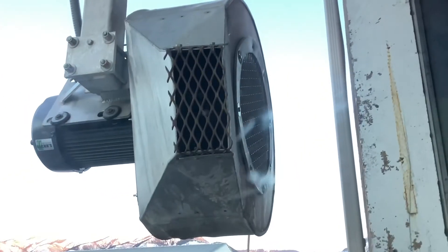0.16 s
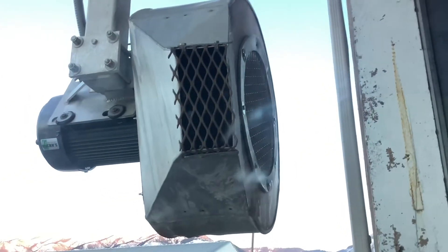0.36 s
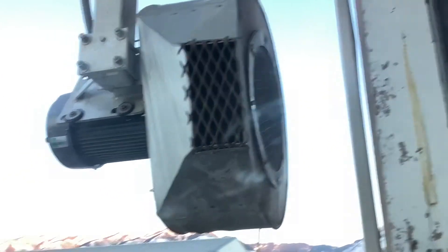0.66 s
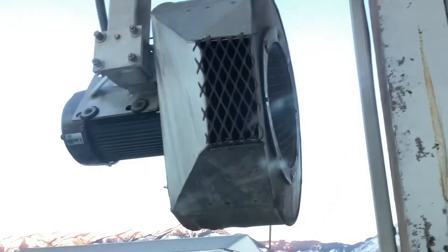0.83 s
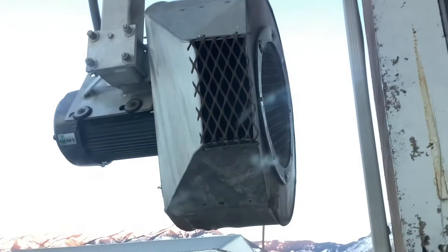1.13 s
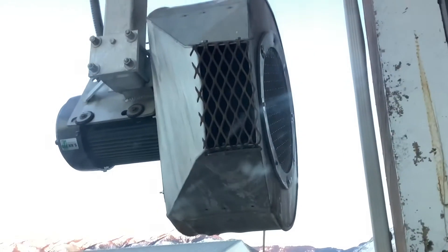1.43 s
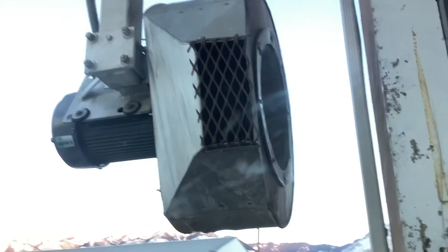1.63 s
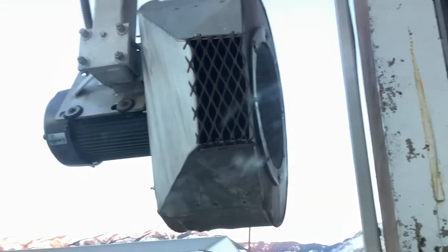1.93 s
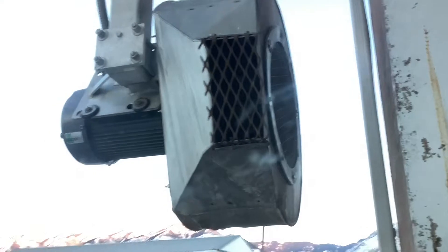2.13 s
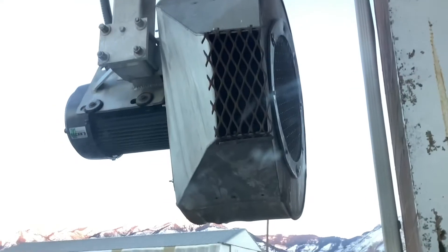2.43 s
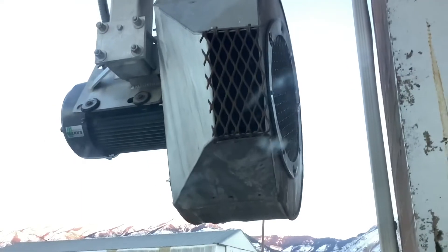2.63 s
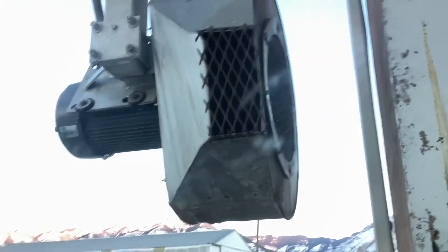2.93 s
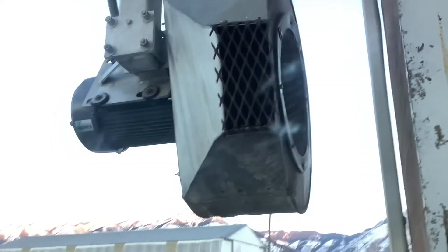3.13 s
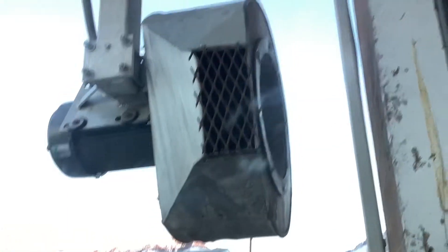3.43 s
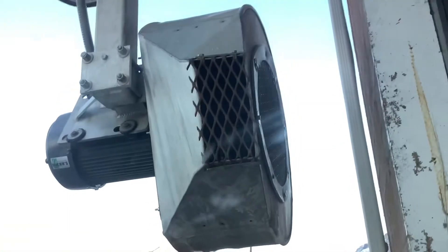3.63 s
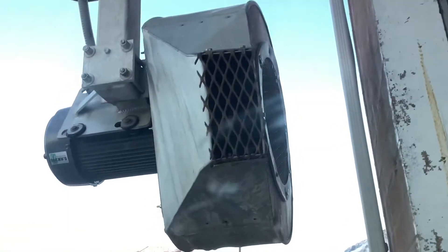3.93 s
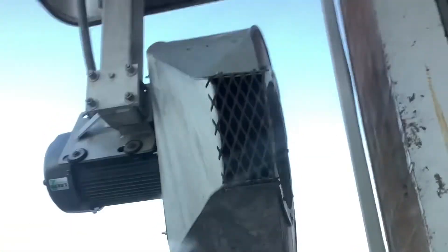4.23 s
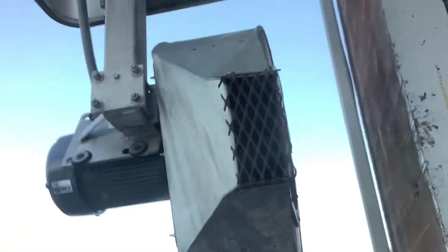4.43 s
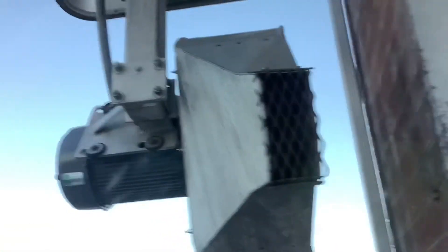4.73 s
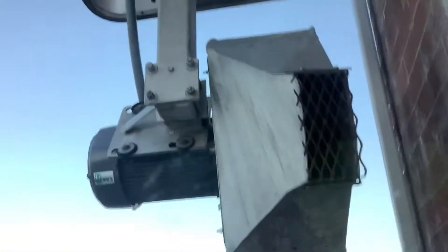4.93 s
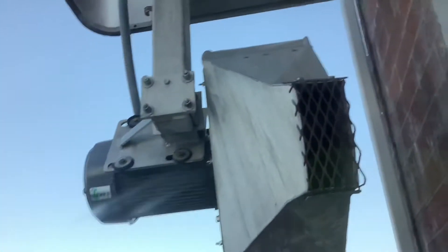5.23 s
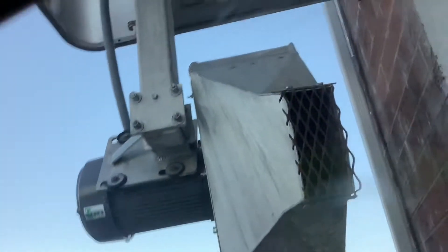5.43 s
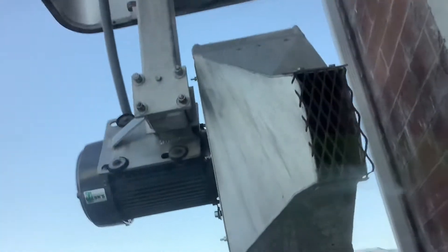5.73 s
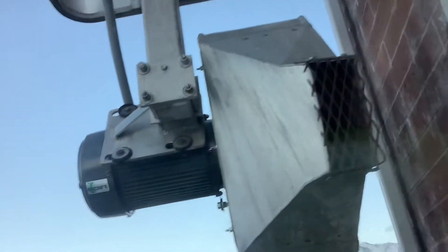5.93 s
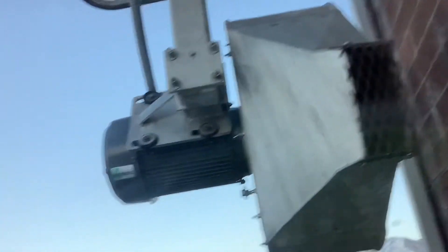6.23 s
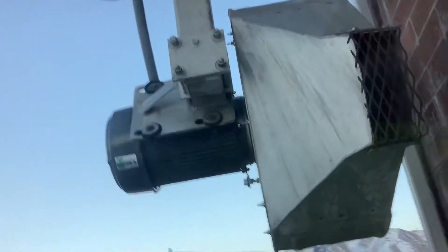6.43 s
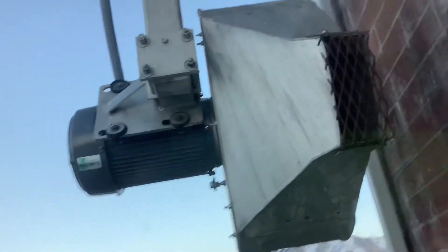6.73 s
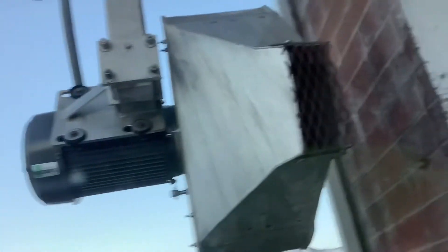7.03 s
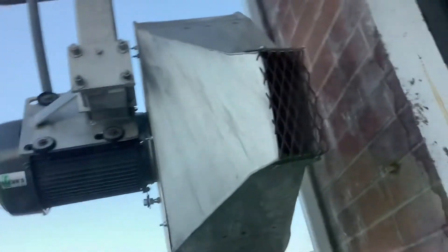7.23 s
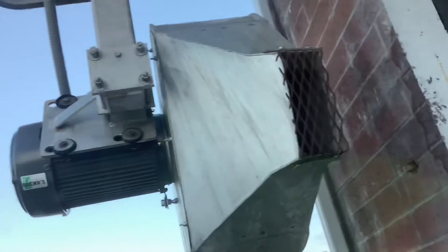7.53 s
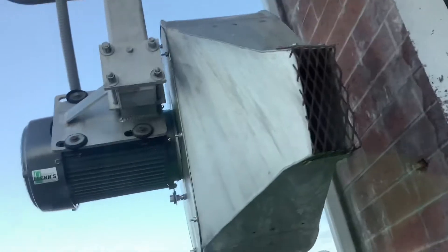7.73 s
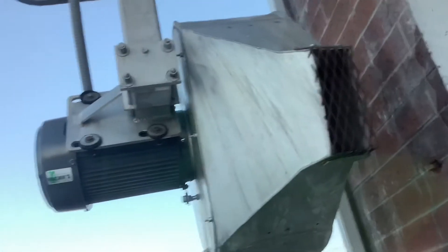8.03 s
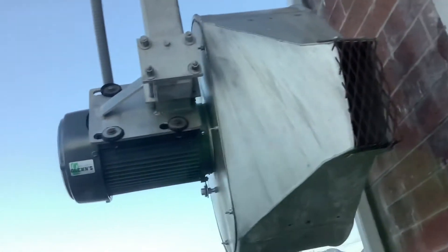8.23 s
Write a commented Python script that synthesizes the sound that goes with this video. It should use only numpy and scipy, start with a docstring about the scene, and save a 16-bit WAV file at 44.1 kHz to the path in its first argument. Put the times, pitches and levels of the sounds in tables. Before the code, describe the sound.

A continuous, loud blower roar fills a closed car cabin from 0 to about 8.4 s, already running at the start and with no silence. Most energy is low, a boomy drumming of air on roof and doors, with softer rush and hiss above. The sweeping jet swells near 0.7, 2.1, 3.6, 5.0, 6.4 and 7.9 s, sinking between; later swings are deeper and heavier. A wavering fan-blade hum, around 590 Hz with faint overtones, surfaces irregularly, clearest near 1.7, 3.1, 6.0 and 7.4 s. A fuzzy, fluttering whistle near 10 kHz flares briefly at 0.3, 0.6, 1.7, 2.7 and 3.9 s, frays after 4.3 s and vanishes around 5.4 s. A fainter, thinner whistle just below it fades around 4 s. As the car creeps past the nozzle, from about 5 s, the treble dulls slightly and the deep rumble strengthens, the roar continuing to the end.

```python
"""Car wash blowers from inside the car

A swinging nozzle sweeps its jet over the body about every 1.4 s and drums on roof, doors and glass:
noise shaped by a spectrum that moves with the jet and the car. The fans roar in the same noise, and their
ten-bladed wheels hum as wavering sines. Air whistles at a window seal, as narrow bands of noise,
until the car creeps on and the seal leaves the jet."""
import sys
import numpy as np
from scipy import signal
from scipy.io import wavfile
from scipy.ndimage import uniform_filter1d

SR = 44100
rng = np.random.default_rng(int(sys.argv[2]) if len(sys.argv) > 2 else 0)


def to_wav(s):
    """Save 16-bit WAV."""
    ch = np.atleast_2d(s).T  # columns
    pcm = np.round(np.clip(ch, -1, 1) * 32767)  # PCM
    wavfile.write(sys.argv[1], SR, pcm.astype(np.int16))


N = 369116  # length in samples


def gain_of(db):
    """dB to amplitude gain."""
    return 10 ** (np.asarray(db) / 20)


def evened(x):
    """Scales to rms 1."""
    return x / np.sqrt(np.mean(x ** 2) + 1e-20)


def bump(x, centre, width):
    """Bell curve of height 1; width is its standard deviation."""
    return np.exp(-0.5 * ((x - centre) / width) ** 2)


def columns(rows, t):
    """The columns of a curve table at times t, joined by straight lines."""
    times, *values = np.transpose(rows)
    return np.array([np.interp(t, times, v) for v in values])


def read(points, hz):
    """Reads a spectrum on a log-frequency axis, level beyond its ends."""
    f, value = np.transpose(points)
    return np.interp(np.log(hz + 1), np.log(f + 1), value)


def wander(hz, span=20):
    """Slow random curve of rms 1: 30 sines from hz / span to hz, the slower ones stronger."""
    t = np.arange(0, N + 64, 64) / SR
    rates = np.geomspace(hz / span, hz, num=30)
    slow = sum(np.sin(2 * np.pi * (f * t + rng.random())) / np.sqrt(f) for f in rates)
    return np.interp(np.arange(N) / SR, t, evened(slow))


def resonate(x, hz, width):
    """Narrow band around the curve hz: shifts it down to zero, smooths twice, shifts back."""
    turn = np.exp(2j * np.pi * np.cumsum(hz * np.ones(N)) / SR)
    r = np.exp(-np.pi * width / SR)
    smooth = x / turn
    for _ in range(2):
        smooth = signal.lfilter([1 - r], [1, -r], smooth)
    return (turn * smooth).real


# The jet's turning points, away from the car and on it by turns:
# [t/s, roof boom level/dB, door drumming level/dB, rush on the glass level/dB]
JET_SWING = [(0, -1, -1.5, -1.5), (.7, 1.3, 2.5, 2.5), (1.4, 0.5, -2.5, -1.5), (2.12, 1, 3, 2.5),
             (2.82, -1, -4.5, -1.5), (3.6, 2.5, 3, 4), (4.33, -2.5, -3.5, -1.5), (5.0, 2.5, 5.5, 0),
             (5.68, -2, -6, -3.5), (6.42, 4, 3.5, 2), (7.1, -2, -6, -2), (7.9, 5.5, 2.5, 1.5),
             (8.55, 1.5, -7.5, 3)]


def sweep(t):
    """Roof, doors and glass swell as the jet swings on and sink as it swings away, slowing at each turn."""
    ends = np.transpose(JET_SWING)[0]
    count = np.arange(len(ends))
    turn = np.interp(t, ends, count)
    eased = np.floor(turn) + 0.5 - 0.5 * np.cos(np.pi * (turn % 1))
    return columns(JET_SWING, np.interp(eased, count, ends))


# The car creeps on: [t/s, place (0 beside the nozzle, 1 under its edge, 2 past it)]
CAR_PLACE = [(0, 0.31), (4.0, 0.2), (5.2, 0.8), (5.8, 1.35), (7.0, 2), (8.37, 2.009)]
# Panels and cabin air shaken by the jet, before swells: [f/Hz, level/dB per Hz]
BODY_SPECTRUM = [(22, -61), (28, -58.5), (67, -39), (121, -36.5), (148, -35), (216, -41.5), (247, -40),
                 (283, -46.5), (303, -46), (331, -45.5), (453, -49.5), (542, -53), (580, -55.5), (620, -57)]
# Fan roar through the shut windows, one spectrum for each place: [f/Hz, level/dB per Hz]
ROAR_SPECTRA = [
    [(660, -60), (814, -64), (1040, -64), (1250, -73), (1390, -64.5), (1450, -66), (1550, -72), (1660, -74),
     (1900, -71.5), (2300, -76.5)],
    [(660, -64), (712, -57), (970, -73), (1230, -69), (1350, -72.5), (1510, -79.5), (1740, -76),
     (1910, -76.5), (2130, -78), (2300, -74.5)],
    [(660, -55), (706, -56.5), (962, -66), (1200, -67), (1350, -70), (1630, -74), (1760, -81),
     (1950, -79.5), (2080, -85), (2300, -83.5)],
]
# Jet hiss and fizz at the seals, one spectrum for each place: [f/Hz, level/dB per Hz]
HISS_SPECTRA = [
    [(2450, -76), (2810, -77.5), (3690, -78), (4080, -80.5), (6140, -88.5), (6380, -90.5), (7400, -85.5),
     (8590, -86), (9490, -78.5), (9850, -97), (10700, -81.5), (11400, -81), (11900, -84.5), (15600, -101.8)],
    [(2450, -83), (2640, -76.5), (2740, -83), (3030, -79.5), (3140, -79), (4500, -87), (5430, -89),
     (6140, -91.5), (8810, -85), (10100, -81.5), (10500, -83), (11300, -87), (13400, -98), (15600, -101.3)],
    [(2450, -80), (2610, -80.5), (2710, -84), (2840, -79), (3340, -86.5), (3510, -82.5), (3980, -85),
     (5560, -88.5), (6300, -91), (7040, -86.5), (9970, -83), (10600, -85), (11700, -90.7), (15600, -100.8)],
]
# Narrow cabin resonances: [f/Hz, width/Hz, lift/dB at each of the three places]
CABIN_RESONANCES = [(517, 21.5, 2, 3, 5), (840, 45, .5, 1.2, 3), (1010, 58, 1.1, 2.5, 1.7),
                    (4700, 92, .1, .1, 2.5), (5600, 150, .1, .1, 2.5)]
DEEP_LIFT_DB = (-5.5, 1.5, 2.5)  # the deepest rumble grows from place to place
DEEP_EDGE_HZ = (45, 70)  # the lift is full below the first, none above the second


def place_spectrum(hz, t):
    """Air noise coloured by panels, windows and cabin, blending from place to place as the car creeps on."""
    place = columns(CAR_PLACE, t)[0]
    near = [np.clip(1 - abs(place - k), 0, 1) for k in range(len(ROAR_SPECTRA))]  # weight of each place
    field_db = np.zeros((len(hz), len(t)))
    for roar, hiss, weight in zip(ROAR_SPECTRA, HISS_SPECTRA, near):
        # body, roar and hiss join end to end into one spectrum
        field_db += np.outer(read([*BODY_SPECTRUM, *roar, *hiss], hz), weight)
    for f, width, *lift_db in CABIN_RESONANCES:
        field_db += np.outer(bump(hz, f, width), np.dot(lift_db, near))
    deep = read(np.c_[DEEP_EDGE_HZ, (1, 0)], hz)
    return field_db + np.outer(deep, np.dot(DEEP_LIFT_DB, near))


# Slow swell of the fans: [t/s, roar level/dB, airy rush level/dB, hiss level/dB]
FAN_SWELL = [(0, 0, -2, -0.5), (1.3, -1, -1.5, -1), (2.9, 0, -1.7, -0.7), (3.7, -0.5, -1, -1.5),
             (4.5, 0, -1.3, 2), (5.2, 1.2, -2.3, 0.5), (5.7, -2, 0, 0.5), (6.3, 1, 0.5, -.8),
             (6.8, -1.5, 1, -0.5), (7.3, -0.7, -1.5, 1), (8.0, 3.5, -0.5, 1.5), (8.37, -1, 0.5, -2.5)]
# Where each swell acts in full, between two still ends: [f/Hz]; first roof, doors, glass
SWEEP_BANDS = (70, 135, 240, 430, 900)
# then roar, airy rush, hiss of the fans
FAN_BANDS = (600, 1000, 2700, 5100, 7500)
# The colour of the rush shifts for a while: [t/s, half length/s, f/Hz, width/Hz, lift/dB]
COLOUR_SHIFTS = [(4.5, 0.35, 2900, 90, 6.5), (5.0, 0.45, 2000, 70, 3.5), (5.2, 0.79, 1520, 120, -0.5),
                 (6.5, .3, 2120, 140, -5), (7.4, .35, 2220, 200, 5), (7.9, 0.46, 1340, 200, 1),
                 (7.4, .4, 2540, 80, 2), (7.5, .5, 5400, 200, 1.5), (6.65, .25, 5100, 540, -2.5),
                 (7.4, 0.37, 3000, 150, -1)]


def swell_spectrum(hz, t):
    """Level changes of jet swing, fans and passing colours, each in its own band."""
    swell_db = np.zeros((len(hz), len(t)))
    for curves, centres in ((sweep(t), SWEEP_BANDS), (columns(FAN_SWELL, t), FAN_BANDS)):
        for k, curve_db in enumerate(curves):
            band = np.arange(len(centres)) == k + 1
            swell_db += np.outer(read(np.c_[centres, band], hz), curve_db)
    for s, half, f, width, lift_db in COLOUR_SHIFTS:
        swell_db += lift_db * np.outer(bump(hz, f, width), bump(t, s, half))
    return swell_db


def grain(hz, t, eddies_db=0.7, drift_db=2.0):
    """Random eddies, and fine drifting ridges from the many small reflections of the cabin."""
    eddies, ridges = rng.standard_normal((len(t), len(hz), 2)).T
    eddies = uniform_filter1d(uniform_filter1d(eddies, size=40, axis=0), size=7, axis=1)
    # ridges: narrow in pitch, drifting within a second
    ridges = uniform_filter1d(uniform_filter1d(ridges, size=8, axis=0), size=35, axis=1)
    # the ridges are strongest in the low treble
    depth = read([(300, 0.093), (2000, 0.7), (6000, 1.0), (12000, 0.6)], hz)[:, None]
    return eddies_db * evened(eddies) + drift_db * evened(ridges) * depth


def rush(gusts, gusts_db=0.7, buffet_db=0.41, seal_hz=6000):
    """Turbulent air: white noise shaped frame by frame, buffeted at the panels and gusting at the seals."""
    frame, hop = 4096, 512  # samples
    noise = rng.standard_normal(N + frame)
    hz, t, air = signal.stft(noise, SR, nperseg=frame, noverlap=frame - hop)
    field_db = place_spectrum(hz, t) + swell_spectrum(hz, t) + grain(hz, t)
    shaped = air * gain_of(field_db) * np.sqrt(SR / 2)  # dB per Hz to noise level
    at_seals = read([(seal_hz / 2, 0), (seal_hz * 2, 1)], hz)[:, None]
    parts = shaped * np.array([1 - at_seals, at_seals])
    body, seals = signal.istft(parts, nperseg=frame, noverlap=frame - hop)[1][:, :N]
    # the jet buffets the panels unevenly; short gusts make the whole treble flicker together
    buffeted = body * gain_of(buffet_db * wander(25.0, span=12))
    return buffeted + seals * gain_of(gusts_db * gusts)


BLADE_HZ = 587.0  # centre pitch: ten blades on a shaft near 59 turns a second
# Tones of several fans add and cancel; rms level before wavering: [t/s, level/dB]
BLADE_LEVEL = [(0, -59), (.3, -41), (1.0, -37.5), (1.25, -41.5), (1.7, -31.5), (2.0, -43.5), (2.6, -39.5),
               (3.1, -35.5), (3.8, -38.5), (4.5, -51), (4.8, -37), (5.5, -51), (6.0, -35), (6.6, -40.5),
               (7.4, -31.5), (7.8, -42), (8.37, -38)]
# Overtones, rms level before wavering: [multiple of the blade tone, level/dB]
BLADE_OVERTONES = [(2, -53.5), (3, -62), (4, -72), (5, -69)]


def blades():
    """The blade tone and its multiples waver as the turbulent air between fan and car shifts."""
    turns = np.cumsum(BLADE_HZ + 2.2 * wander(9.0)) / SR  # cycles of the blade tone
    level_db = columns(BLADE_LEVEL, np.arange(N) / SR)[0] + 3.3 * wander(14.0)
    hum = gain_of(level_db) * np.sin(2 * np.pi * turns)
    for k, db in BLADE_OVERTONES:
        hum += gain_of(db + 2.0 * wander(3.9)) * np.sin(2 * np.pi * (k * turns + rng.random()))
    return np.sqrt(2) * hum  # sine peak from rms level


# Air through the main slit in the seal, before flares, flutter, drift and fade-out; the fray is
# relative to the core: [t/s, level/dB, nominal f/Hz, frayed upper edge level/dB]
SEAL_WHISTLE = [(0, -48, 10000, -5), (1.2, -47, 10060, -11), (2.2, -46.5, 10000, -7),
                (3.2, -45, 10040, -13), (4.1, -45.5, 10060, -5), (4.35, -48.5, 10000, -1),
                (4.6, -48.5, 10350, 1), (4.9, -53, 10000, 2), (5.4, -56, 10000, -3)]
# The whistle flares: [t/s, lift/dB]
WHISTLE_FLARES = [(.28, 2.5), (.62, 3.5), (1.36, 1), (1.71, 5), (2.7, 3.5), (3.87, 4), (4.32, 2.5)]
FLARE_S = 0.059  # half width of a flare
PUFFS_DB, QUAVER_HZ = 0.1, 30.0  # rms of the lesser puffs and of the random pitch drift
SLIT_HZ = 9720  # the main slit passes next to nothing lower


def high_whistle(gusts):
    """Main slit: fuzzy narrow noise with a sharp lower edge, fraying upward and fluttering in the gusts."""
    t = np.arange(N) / SR
    level_db, hz, fray_db = columns(SEAL_WHISTLE, t)
    flares_db = sum(db * bump(t, s, FLARE_S) for s, db in WHISTLE_FLARES)
    level_db = level_db + PUFFS_DB * gusts + flares_db
    hz = hz + QUAVER_HZ * wander(13.0)
    core = evened(resonate(rng.standard_normal(N), hz - 70, 390.0))
    fray = evened(resonate(rng.standard_normal(N), 1.025 * hz, 1000.0))
    slit = signal.ellip(6, 0.5, 30, SLIT_HZ, "high", fs=SR, output="sos")
    tone = evened(signal.sosfilt(slit, core + gain_of(fray_db) * fray))
    flutter_db = 1.9 * wander(70.0, span=8)
    # the slit falls silent once the jet has passed it
    return gain_of(level_db + flutter_db) * tone / (1 + np.exp((t - 5.4) * 8))


# A thinner slit, one row: [f/Hz, width/Hz, level/dB, middle of the fade-out t/s]
THIN_SLIT = (8905, 80, -60.5, 3.9)


def low_whistle():
    """Thinner slit: a fainter, narrower band of noise at a steady pitch, fading out."""
    hz, width, db, end = THIN_SLIT
    t = np.arange(N) / SR
    tone = evened(resonate(rng.standard_normal(N), hz, width))
    return gain_of(db) * tone / (1 + np.exp((t - end) * 4))


def scene():
    """All sources at the microphone; the same gusts stir the seals and the main whistle."""
    gusts = wander(45.0, span=8)
    return (rush(gusts) + blades() + high_whistle(gusts) + low_whistle())[None]


def record(dry):
    """The microphone loses the deepest bass and softly rounds the loudest swings; then the band limit."""
    thinned = signal.sosfilt(signal.butter(6, 35, "high", fs=SR, output="sos"), dry)
    rounded = 1.329 * np.tanh(thinned / 1.323)
    band_limit = signal.firwin(1023, 15680, window=("kaiser", 9), fs=SR)  # low-pass edge in Hz
    return signal.oaconvolve(rounded, band_limit[None], "same")


dry = scene()
out = record(dry)
to_wav(out)
```